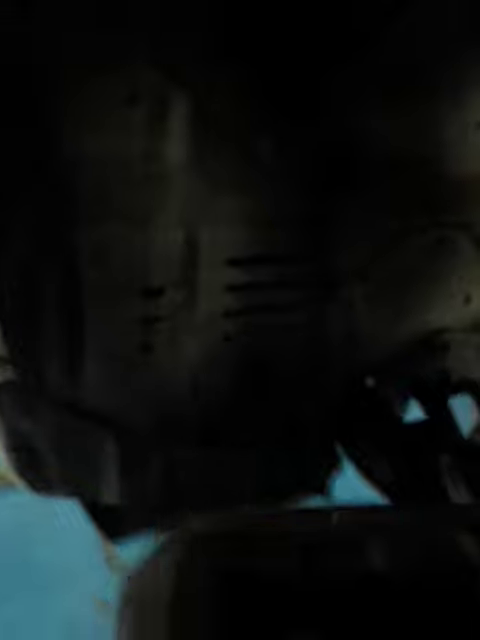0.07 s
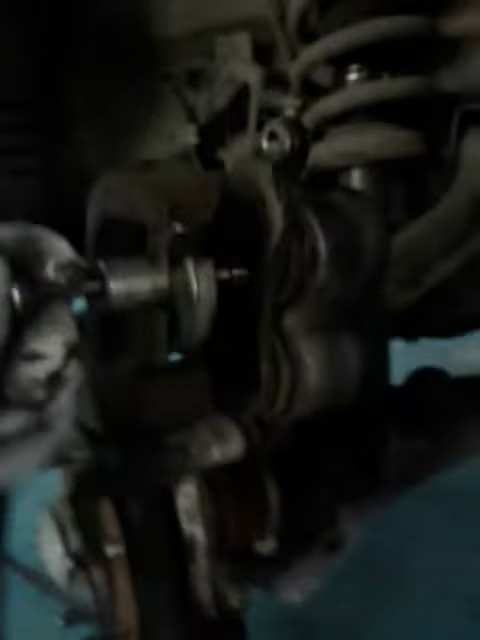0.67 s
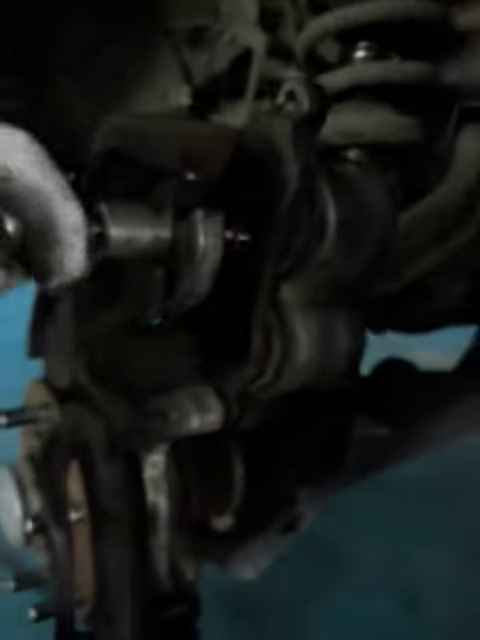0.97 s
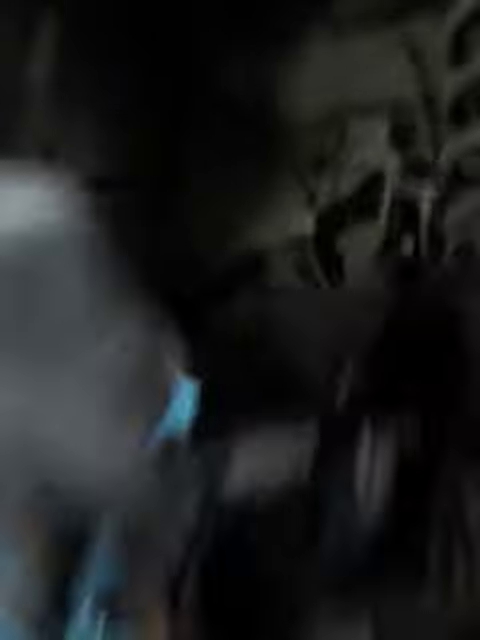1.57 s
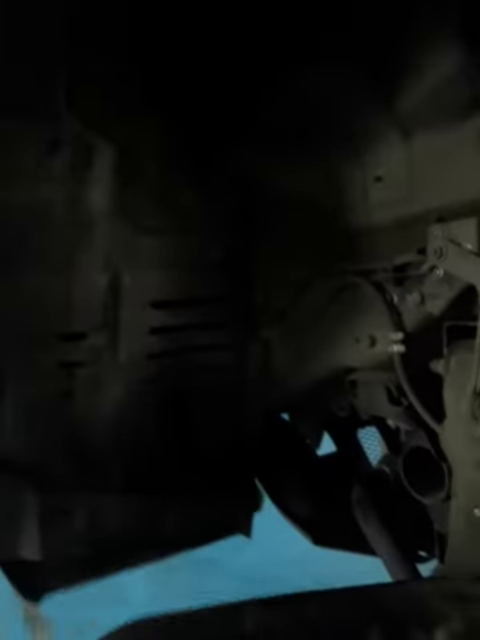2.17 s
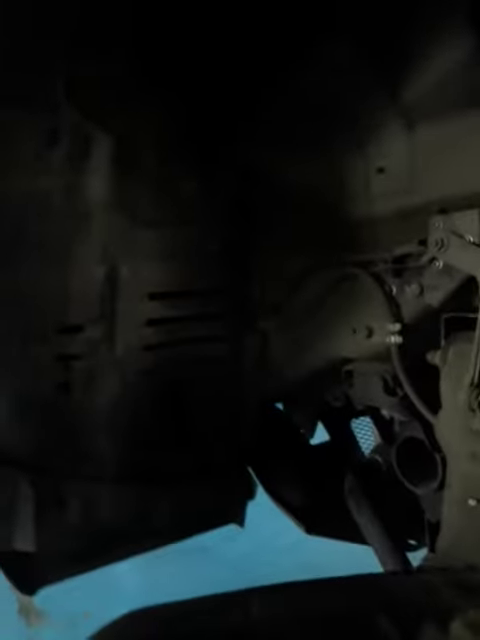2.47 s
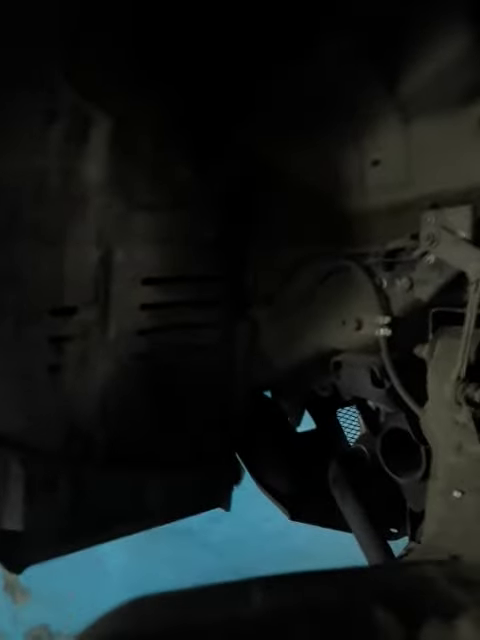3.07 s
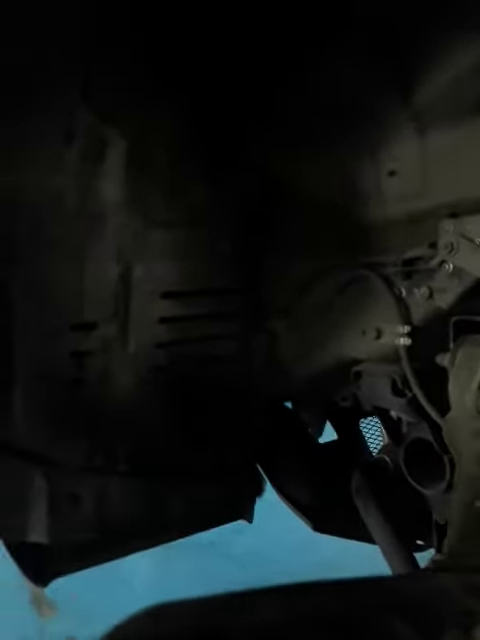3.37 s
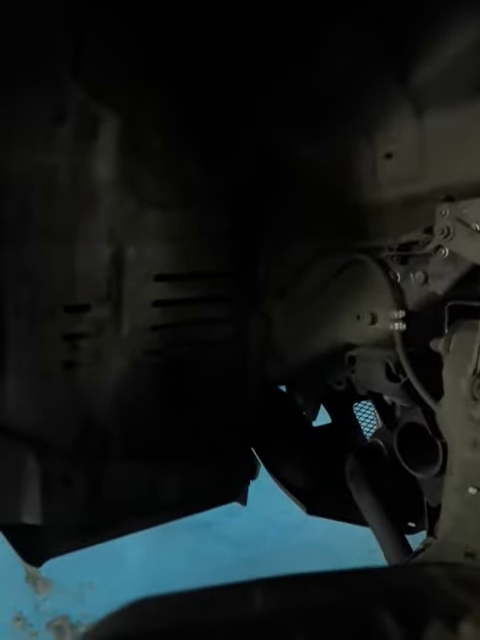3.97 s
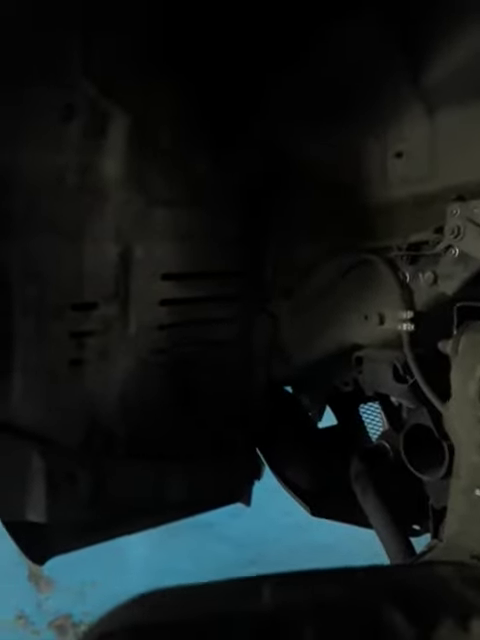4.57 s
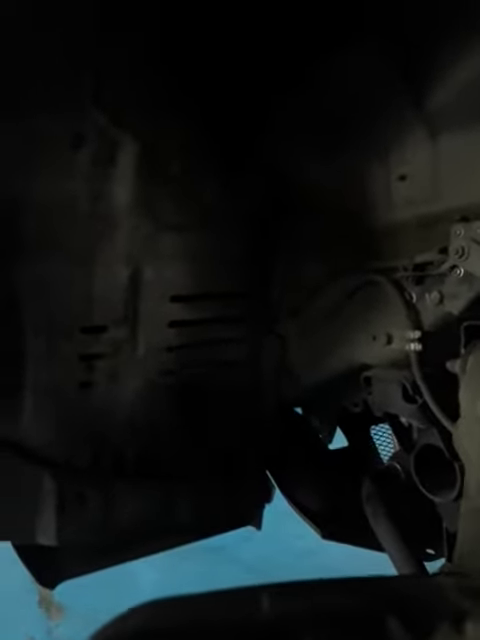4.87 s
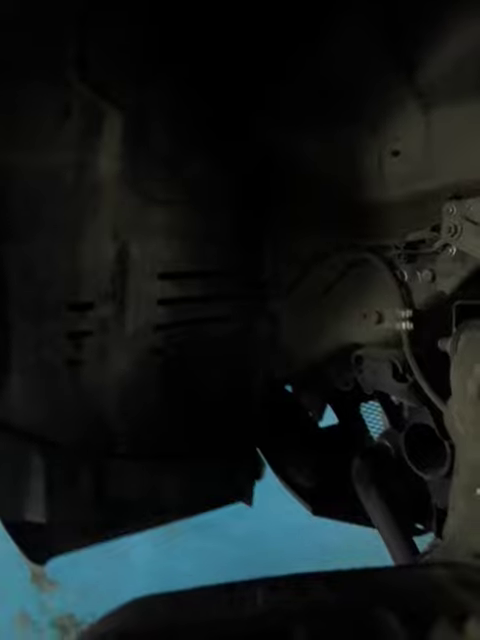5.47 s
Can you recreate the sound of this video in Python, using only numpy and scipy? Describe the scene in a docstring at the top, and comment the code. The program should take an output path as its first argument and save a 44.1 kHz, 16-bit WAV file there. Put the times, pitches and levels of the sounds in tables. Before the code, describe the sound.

Close-up work on a car's brake in a workshop. After one short ringing knock on the caliper, sharp dry clicks come in an uneven cluster. Then a steel tool clinks and rattles in several brief bursts, bright and quickly damped, the last right at the end. A glove rubs faintly now and then, and a low, steady machine hum and background noise fill the gaps.

```python
"""A garage, close to work on a brake caliper. Under everything lie the hum of distant machines and the
workshop's wash of noise, with low swells in it. A glove brushes the parts with a friction hiss, the heavy
caliper clunks in damped modes, and handling gives dry ticks. A steel hand tool clinks and chatters
against its seat in short bouts: each impact excites its modes, and the harder ones drive the caliper too.
The metal sounds reflect from the wheel arch and the room."""
import sys
import numpy as np
from scipy import signal
from scipy.fft import rfft, irfft, next_fast_len
from scipy.io import wavfile

SR = 44100
rng = np.random.default_rng(int(sys.argv[2]) if len(sys.argv) > 2 else 0)


def int16_out(signal):
    """Quantize to a 16-bit WAV file."""
    q = np.round(np.clip(np.atleast_2d(signal).T, -1, 1) * 32767)
    wavfile.write(sys.argv[1], SR, q.astype(np.int16))


N = 252252

# Noise spectra of the workshop's wash, the glove, the caliper's body and the tool's crowd of
# fast-dying modes. Each row: frequency in Hz, relative spectral density in dB.
WASH_SPECTRUM = [(15, -65), (25, -44), (45, -8), (108, -2.5), (145, -3), (180, -1.5), (200, -5.5),
                 (317, -10.5), (354, -5.5), (463, -10.5), (516, -8.5), (575, -8.5), (1700, -12.5),
                 (11600, -39), (16000, -41)]
BRUSH_SPECTRUM = [(1000, -43), (3500, -8), (4800, 3), (6000, -1.5), (8200, 5.5), (10500, -1), (13500, -2),
                  (16000, -9)]
CLUNK_SPECTRUM = [(300, -21), (750, -2), (1100, 16), (1700, 12), (2600, 2.5), (6800, -7), (11000, -19),
                  (16000, -38)]
CLASH_SPECTRUM = [(200, -16), (400, -6), (900, -15), (1800, -2.5), (2400, -6.5), (3700, -3), (4900, -1),
                  (5700, -3.5), (7300, 4), (8200, -9.5), (9200, 1), (12200, -7), (13100, 2.5), (16000, -39)]
# Course of the wash. Each row: time in seconds, level in dB.
WASH_LEVELS = [(0.0, -39), (2.15, -39), (2.42, -40), (4.44, -39), (4.99, -40), (5.46, -39.5), (5.72, -38.5)]
# Partials of the machine hum. Each row: frequency in Hz, level in dB.
HUM_PARTIALS = [(87, -54.5), (118.4, -50), (177, -54.5), (255, -65), (352, -54), (436, -59), (501, -54.5),
                (528, -62)]
# Low swells in the background noise. Each row: middle in seconds, length in seconds,
# frequency in Hz, level in dB.
BACKGROUND_SWELLS = [(0.504, 1.04, 364, -48), (1.096, 1.79, 252, -48.5), (2.333, .6, 111, -42.5),
                     (5.543, 0.56, 89, -42.5)]
# Strokes of the glove. Each row: middle in seconds, length in seconds, level in dB.
GLOVE_STROKES = [(0.528, 0.022, -51), (1.848, 0.012, -40.5), (1.923, 0.053, -53), (2.244, 0.078, -48),
                 (2.947, 0.17, -47), (3.134, 0.11, -57), (4.428, 0.087, -43), (4.52, 0.05, -46),
                 (5.087, 0.26, -56.5)]
# Blows on the caliper. Each row: start in seconds, level in dB, relative ring level in dB,
# relative thud level in dB, thud pitch in Hz.
CALIPER_BLOWS = [(0.676, -28, 9.5, -8, 330), (.684, -28, 9.5, -11, 324), (2.075, -31.5, -20, -0.5, 197),
                 (2.093, -33.5, -2, 1.5, 204), (2.904, -28, -12, -7, 356)]
# The caliper's answer to a blow on the tool: relative ring and thud levels in dB, thud pitch in Hz.
CALIPER_ANSWER = (-14, -5.5, 396)
# Modes of the caliper, of the tool's slow bending and of its three loose parts.
# Each row: frequency in Hz, relative level in dB, nominal time to decay by 60 dB in seconds.
CALIPER_MODES = [(1028, -10, .2), (1303, -17, .14), (1418, -25, .9), (1580, -9, .09), (2606, -17, .12),
                 (5200, -29, .16), (5760, -28, .13), (6850, -22, .08), (7230, -29, .18)]
BENDING_MODES = [(1137.6, -16, 0.11), (1275, -17, 0.048)]
HANDLE_MODES = [(1876, -21, 0.013), (2823, -13.5, 0.068), (4830, -6.5, 0.058), (7145, -0.5, 0.064),
                (10540, -19.5, 0.092), (13230, -19.5, 0.07)]
PLATE_MODES = [(4360, -5.5, 0.026), (4530, -4, 0.03), (6670, 0, 0.012), (8870, -7.5, 0.024),
               (9940, -8.5, 0.095), (11370, -10, 0.04), (11600, -19, 0.053), (15700, -13, .055)]
NUT_MODES = [(6420, -1.5, 0.046), (10530, -9.5, 0.097), (14520, -15, .068), (14860, -14, .06)]
# Handling ticks. Each row: start in seconds, peak level in dB.
TICKS = [(1.4805, -25), (1.5671, -8), (1.5788, -20), (1.6264, -15), (1.6818, -20.5), (1.714, -6),
         (1.7646, -5), (1.789, -10), (1.8455, -23.5), (1.8848, -7.5), (1.919, -20), (2.262, -29)]
# Spectrum of a plain tick. Each row: frequency in Hz, relative spectral density in dB.
TICK_SPECTRUM = [(200, -35), (700, -17), (1100, 2), (1700, 3.5), (3600, -3), (4400, -10), (5000, -9),
                 (6000, -21), (6700, -5), (7600, -11.5), (8700, -0.5), (9700, -11), (13500, -38),
                 (16000, -32)]
# Blows on the tool. Each row: start in seconds, level in dB, spot struck, relative bending level in dB.
TOOL_BLOWS = [(1.971, -27.5, "nut", -6), (2.064, -31, "seat", -10), (2.7252, -7.5, "shank", -13.5),
              (2.7995, -6, "stop", -24), (2.8681, -19.5, "collar", 2), (2.872, -13.5, "seat", -12),
              (2.9087, -20, "handle", -18), (2.921, -27, "seat", -20), (3.0443, -39, "stop", 10),
              (3.5922, -30, "stop", 8), (3.606, -20, "seat", -7), (3.6248, -26, "nut", 16),
              (4.0556, -8, "plate", -1), (4.110, -31.5, "nut", 12), (4.1854, -12, "handle", -10),
              (4.189, -15, "plate", -2), (4.255, -24.5, "handle", 15.5), (4.266, -20, "seat", -6),
              (4.2841, -18.5, "handle", -14), (4.331, -15, "collar", 1), (4.3353, -13, "collar", -15),
              (5.1624, -31, "nut", -14), (5.5775, -11, "shank", 4), (5.633, -13, "seat", -7),
              (5.6413, -15, "collar", -3)]
# Spots where the tool is struck. Each row: best-driven frequency in Hz, its lift in dB, tilt in dB per
# octave, handle, plate and nut levels in dB, ring time factor, share passed to the caliper in dB.
SPOTS = {"shank": (2830, 13, 3, -4.5, -6, -22, 0.66, -21),
         "plate": (10095, 1.5, 2, -6.5, 0, -10, 0.75, -24.5),
         "stop": (1844, 13.5, -1.8, 2, -17, -26, 0.53, -27),
         "seat": (4705, 7.5, -2, -16, -21, -23, 0.76, -13),
         "handle": (7239, 5.5, .3, -5.5, -8, -16, 0.46, -21),
         "collar": (2952, 3, -3.5, 5, -16, 0.5, 0.66, -14),
         "nut": (10403, 4.5, -1, -6.5, -4, -4, 1.07, -27)}
# Chatter of the loose tool. Each row: start in seconds, length in seconds, mean level in dB,
# relative bending level in dB.
CHATTER = [(2.769, .01, -31, -5), (2.904, .01, -33.5, -8), (4.235, .02, -36, 17), (4.318, .015, -26.5, 0),
           (5.657, .02, -28, 8)]
# The tool rocks over and lands again. Each row: first spot, second spot, relative level in dB.
REBOUNDS, REBOUND_S = {"shank": ("plate", -1), "collar": ("nut", -15.5)}, 0.0048


def amp(db):
    """Amplitude ratio of a level in decibels."""
    return np.exp(np.asarray(db) * (np.log(10) / 20))


def unit(x):
    """Normalisation to rms 1."""
    return x / np.sqrt(np.mean(x ** 2) + 1e-20)


def level_at(spectrum, hz):
    """Interpolation of a spectrum in dB along a log-frequency axis."""
    knots_hz, db = np.transpose(spectrum)
    return np.interp(np.log(hz + 1), np.log(knots_hz + 1), db)


def add(mix, start_s, sound):
    """Superposition: a sound adds into the mix from its start time."""
    part = mix[max(round(start_s * SR), 0):][:len(sound)]
    part += sound[:len(part)]


def noise(colour, size):
    """Spectral shaping: noise of rms 1 whose spectrum in dB follows colour(Hz)."""
    hz = np.fft.rfftfreq(size, 1 / SR)
    return unit(irfft(rfft(rng.standard_normal(size)) * amp(colour(hz)), size))


def drift(rate_hz, step=16):
    """Slow random fluctuation: low-passed noise of rms about 1."""
    size = next_fast_len(N // step + 2)
    coarse = noise(lambda hz: -10 * np.log10(1 + (hz / step / rate_hz) ** 4), size)
    return np.interp(np.arange(N) / step, np.arange(size), coarse)


def decay(t, t60):
    """Free exponential decay, 60 dB in t60 seconds."""
    return amp(-60 * t / max(t60, 1e-4))


def workshop(flutter_db=.5, waver_db=3.0, wander_hz=1.37):
    """Random modulation: a broadband wash flutters; distant machines hum, wavering in level and pitch."""
    level_db = np.interp(np.arange(N) / SR, *np.transpose(WASH_LEVELS))
    wash = amp(level_db + flutter_db * drift(30)) * noise(lambda hz: level_at(WASH_SPECTRUM, hz), N)
    hum = np.zeros(N)
    for hz, db in HUM_PARTIALS:
        waver = amp(waver_db * drift(3.4))
        cycles = np.cumsum(hz + wander_hz * drift(6.8)) / SR
        hum += amp(db) * unit(waver * np.sin(2 * np.pi * cycles))
    return wash + hum


def background_swells(width_hz=7):
    """Narrow-band fluctuation: the background noise swells and fades around a few low frequencies."""
    out = np.zeros(N)
    for middle, length, centre_hz, db in BACKGROUND_SWELLS:
        size = int(length * SR)
        band = noise(lambda hz: -20 * np.log10(1 + ((hz - centre_hz) / width_hz) ** 2), N)[:size]
        add(out, middle - length / 2, amp(db) * unit(band) * signal.windows.hann(size))
    return out


def glove_brushes(grain_db=1.5):
    """Sliding friction makes a soft grainy hiss that swells and fades with each stroke."""
    pressure = np.zeros(N)
    for middle, length, db in GLOVE_STROKES:
        add(pressure, middle - length / 2, amp(db) * signal.windows.hann(int(length * SR)))
    grain = amp(grain_db * drift(300))
    return pressure * grain * noise(lambda hz: level_at(BRUSH_SPECTRUM, hz), N)


def caliper_ring(t, detune=0.0013):
    """Free vibration: the caliper's modes are damped sinusoids, slightly detuned from blow to blow."""
    shifts = 1 + detune * rng.standard_normal(len(CALIPER_MODES))
    return sum(amp(db) * decay(t, t60) * np.sin(2 * np.pi * hz * shift * t)
               for (hz, db, t60), shift in zip(CALIPER_MODES, shifts))


def caliper_clunks(body_t60=0.085, thud_t60=0.15, swell_s=0.0046, skirt_db_per_octave=24, stir_db=-40):
    """Mechanical coupling: direct blows and hard ones on the tool sound caliper and suspension."""
    out, t = np.zeros(N), np.arange(16384) / SR
    passed_on = [(start, db + SPOTS[spot][-1]) for start, db, spot, _ in TOOL_BLOWS]
    answers = [(start, db, *CALIPER_ANSWER) for start, db in passed_on if db > stir_db]
    for start, db, ring_db, thud_db, thud_hz in CALIPER_BLOWS + answers:
        body = noise(lambda hz: level_at(CLUNK_SPECTRUM, hz), len(t)) * decay(t, body_t60)
        thud = noise(lambda hz: -skirt_db_per_octave * abs(np.log2((hz + 1) / thud_hz)), len(t))
        thud *= decay(t, thud_t60) * (1 - np.exp(-t / swell_s))  # the suspension's low response
        add(out, start, amp(db) * (body + amp(thud_db) * thud + amp(ring_db) * caliper_ring(t)))
    return out


def garage_reverb(x, arch_db=-15, arch_t60=0.065, room_db=-24, room_t60=0.26, treble_t60=0.34):
    """Reflection: quick echoes from the wheel arch and the garage's faint tail join the direct sound."""
    t = np.arange(SR * 3 // 4) / SR
    signs = rng.choice([-1., 1.], len(t))
    taps = signs * (rng.random(len(t)) < 3000 / SR) * (t > .002)  # about 3000 echoes a second
    dull_taps = signal.sosfilt(signal.butter(2, 4000, fs=SR, output="sos"), taps)
    arch = taps * decay(t, arch_t60)
    room = dull_taps * decay(t, room_t60) + 0.25 * taps * decay(t, treble_t60)
    echoes = amp(arch_db) * arch / np.linalg.norm(arch) + amp(room_db) * room / np.linalg.norm(room)
    return x + signal.fftconvolve(x, echoes)[:N]


def handling_ticks(pitch_spread=0.013, plain_db=-9, tilt_per_db=0.48):
    """Minimum-phase impulses: the energy comes at once and dies in milliseconds; harder is brighter."""
    out, hz = np.zeros(N), abs(np.fft.fftfreq(2048, 1 / SR))
    for start, db in TICKS:
        tilt_db = tilt_per_db * (db - plain_db) * np.log2(np.maximum(hz, 1000))
        shift = 1 + pitch_spread * rng.standard_normal()
        log_gain = np.log(amp(level_at(TICK_SPECTRUM, hz * shift) + tilt_db))
        snap = np.fft.ifft(np.exp(np.conj(signal.hilbert(log_gain)))).real
        add(out, start, amp(db) * snap / abs(snap).max())
    return out


def tool_contacts(chatter_per_s=90, scatter_db=2, jitter=0.23):
    """A loose body bounces: the tool's blows, rebounds and chatter, in rows like TOOL_BLOWS."""
    contacts = list(TOOL_BLOWS)
    for start, db, spot, bend_db in TOOL_BLOWS:
        if spot in REBOUNDS:
            landing, rebound_db = REBOUNDS[spot]
            contacts.append((start + REBOUND_S, db + rebound_db, landing, bend_db))
    for start, length, db, bend_db in CHATTER:
        for due in np.arange(start, start + length, 1 / chatter_per_s):
            late, strength = rng.standard_normal(2)
            spot = rng.choice(["handle", "seat", "nut"])
            contacts.append((due + jitter * late / chatter_per_s, db + scatter_db * strength, spot, bend_db))
    return contacts


def tool_clinks(contacts, clash_db=-4, clash_t60=0.054, contact_s=0.00006, buzz_s=0.0003, seat_s=0.018,
                seated_gain=0.22, firm_db=-11.5, tilt_per_db=0.4765, halving_db=63, grip_wobble=0.00259):
    """Impact excitation: steel on steel clashes, and the tool's parts ring until seating damps them."""
    out, t = np.zeros(N), np.arange(8192) / SR
    parts = BENDING_MODES, HANDLE_MODES, PLATE_MODES, NUT_MODES
    energies = [np.zeros((len(modes), N)) for modes in parts]
    attack = 1 - np.exp(-t / contact_s)
    build = 1 - np.exp(-t / buzz_s)  # the faces buzz together for a moment, pumping the modes up
    for start, db, spot, bend_db in contacts:
        focus_hz, lift_db, tilt, *part_dbs, hold, _ = SPOTS[spot]
        tilt += tilt_per_db * (db - firm_db)  # harder blows are brighter
        hold *= 2 ** ((firm_db - db) / halving_db)  # and press the tool home sooner

        def drive_db(hz, pivot_hz=5000, focus_octaves=0.21):
            """Excitation spectrum: a tilt, and a peak at the modes that the struck spot favours."""
            focus = np.exp(-.5 * (np.log2((hz + 1) / focus_hz) / focus_octaves) ** 2)
            return tilt * np.log2(np.maximum(hz, 1000) / pivot_hz) + lift_db * focus

        choke = seated_gain + (1 - seated_gain) / (1 + (t / (seat_s * hold)) ** 4)
        clash = noise(lambda hz: level_at(CLASH_SPECTRUM, hz) + drive_db(hz), len(t))
        add(out, start, amp(db + clash_db) * attack * choke * decay(t, clash_t60 * hold) * clash)
        for modes, stores, part_db in zip(parts, energies, [bend_db, *part_dbs]):
            for (hz, mode_db, t60), energy in zip(modes, stores):
                if modes is BENDING_MODES:  # slow bending escapes the damping of the seat
                    swing = decay(t, t60)
                else:
                    swing = amp(drive_db(hz)) * choke * decay(t, t60 * hold)
                add(energy, start, (amp(db + part_db + mode_db) * build * swing) ** 2)
    for modes, stores in zip(parts, energies):
        for (hz, _, _), energy in zip(modes, stores):
            live = energy > 0
            pitch_hz = hz * (1 + grip_wobble * drift(62.6)[live])  # the shifting grip bends the pitch
            out[live] += np.sqrt(energy[live]) * np.sin(2 * np.pi * np.cumsum(pitch_hz) / SR)
    return out


def scene():
    """Superposition in one channel: background, dry ticks and brushes, and reverberant metal."""
    background = workshop() + background_swells()
    close = handling_ticks() + glove_brushes()
    metal = tool_clinks(tool_contacts()) + caliper_clunks()
    return (background + close + garage_reverb(metal))[None]


def record(dry, port_hz=9550, port_width_hz=700, port_depth=0.41, edge_hz=15950):
    """Microphone response: a bass cut, a dip from its port, soft saturation and a band limit."""
    thin = signal.sosfilt(signal.butter(3, 42, "highpass", fs=SR, output="sos"), dry)
    port = signal.lfilter(*signal.iirpeak(port_hz, port_hz / port_width_hz, fs=SR), thin)
    rounded = np.tanh(thin - port_depth * port)
    lowpass = signal.firwin(401, edge_hz, window=("kaiser", 9), fs=SR)
    return signal.oaconvolve(rounded, lowpass[None], "same")


dry = scene()
out = record(dry)
int16_out(out)
```